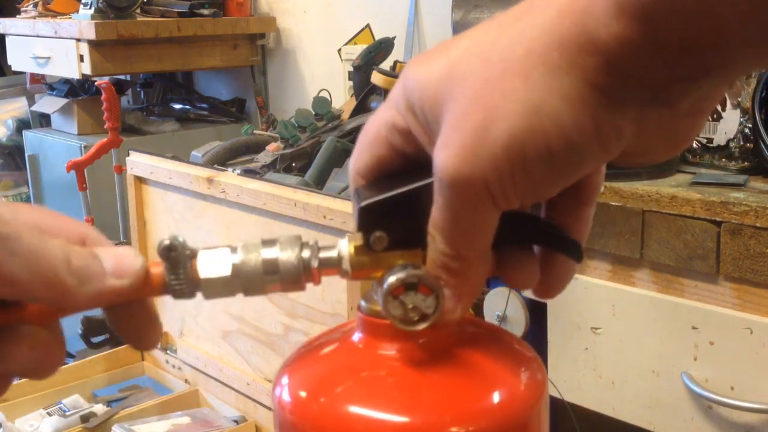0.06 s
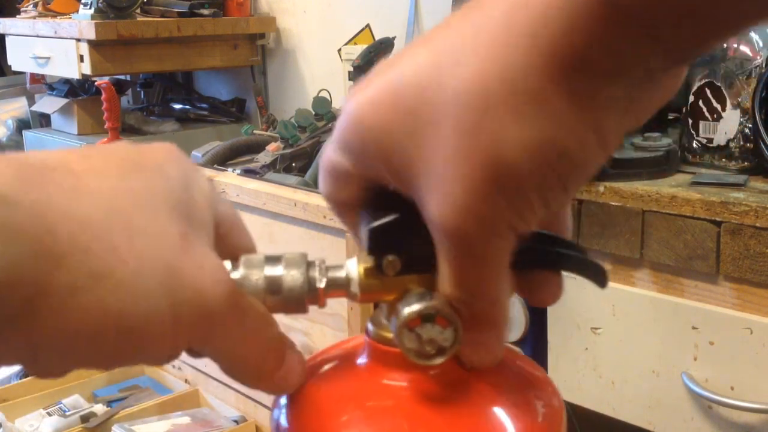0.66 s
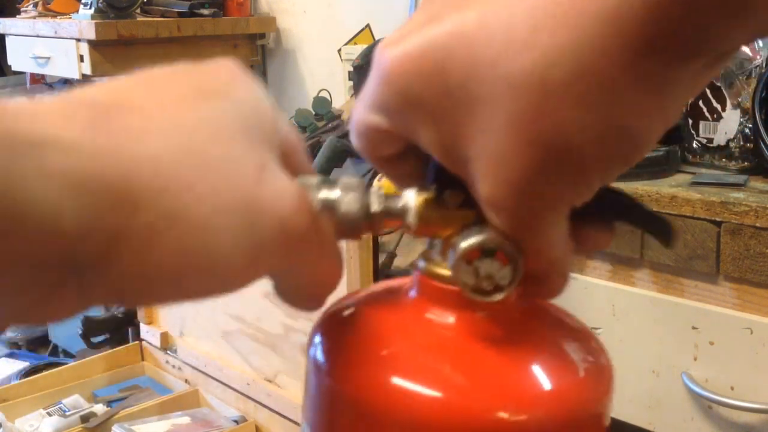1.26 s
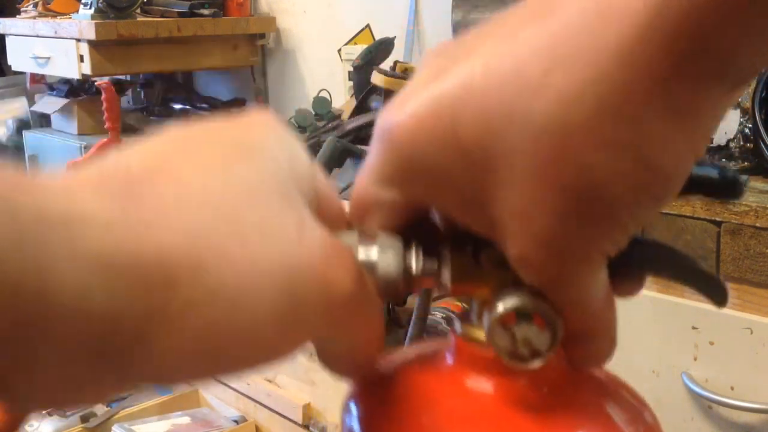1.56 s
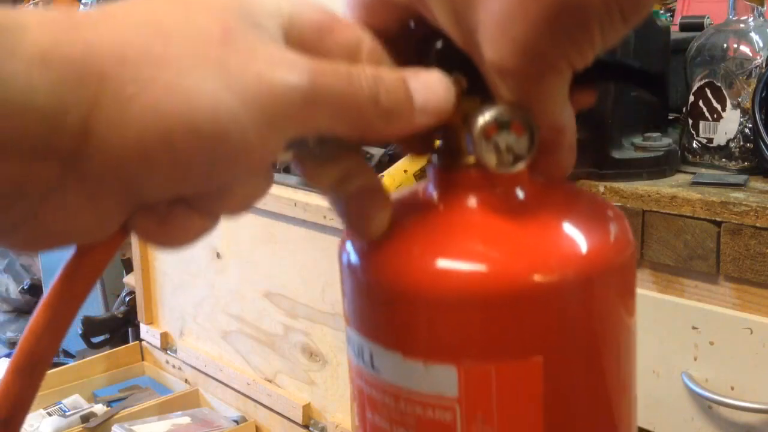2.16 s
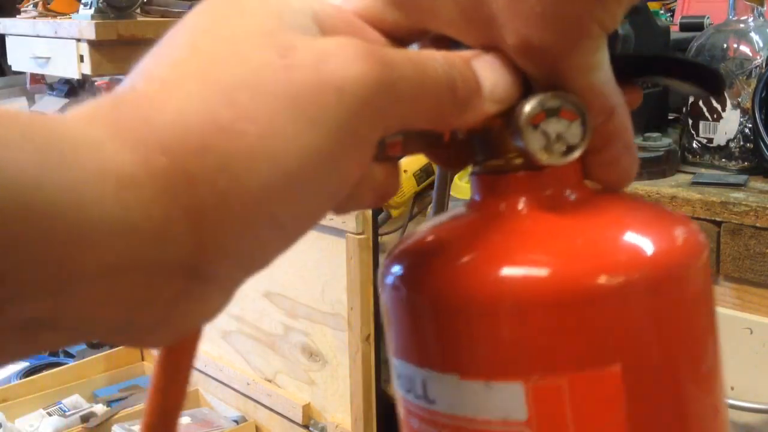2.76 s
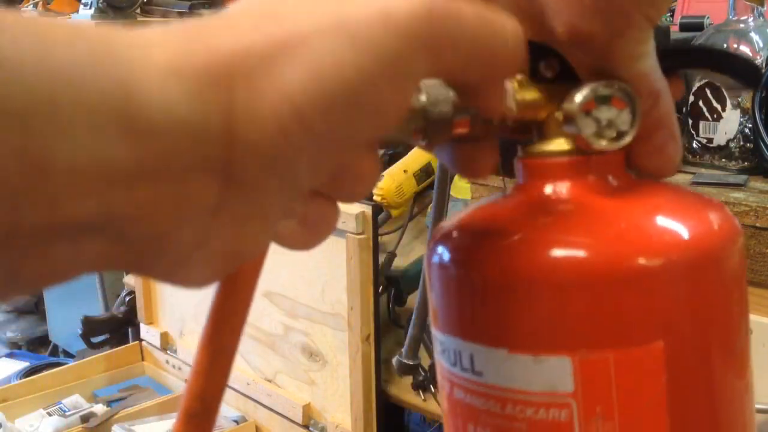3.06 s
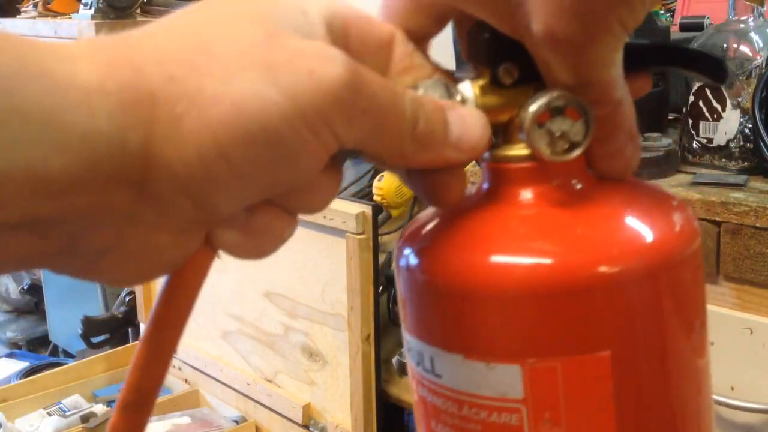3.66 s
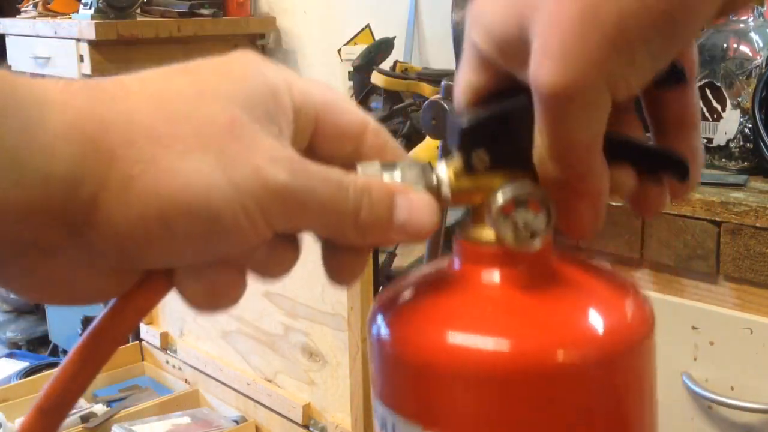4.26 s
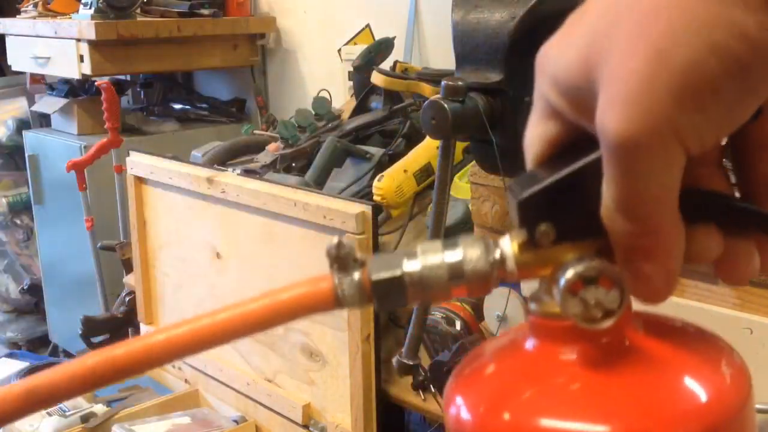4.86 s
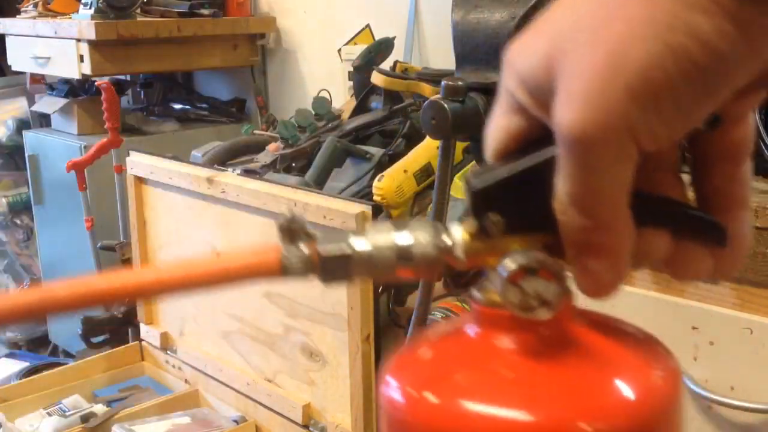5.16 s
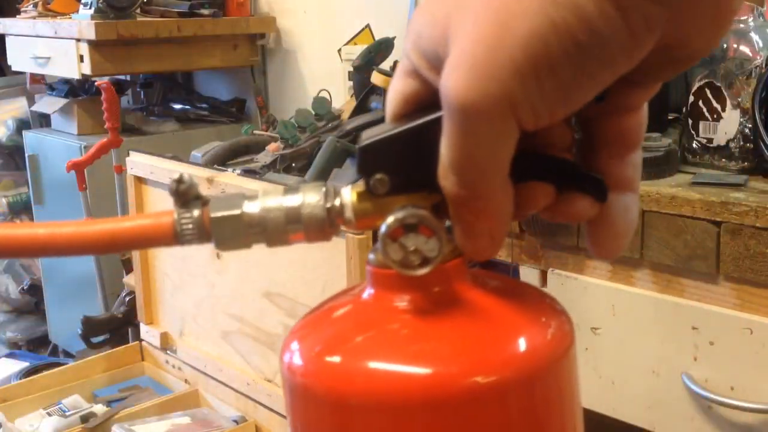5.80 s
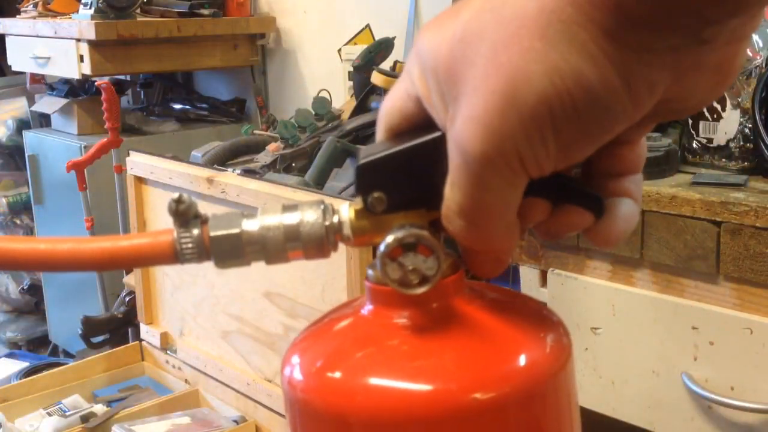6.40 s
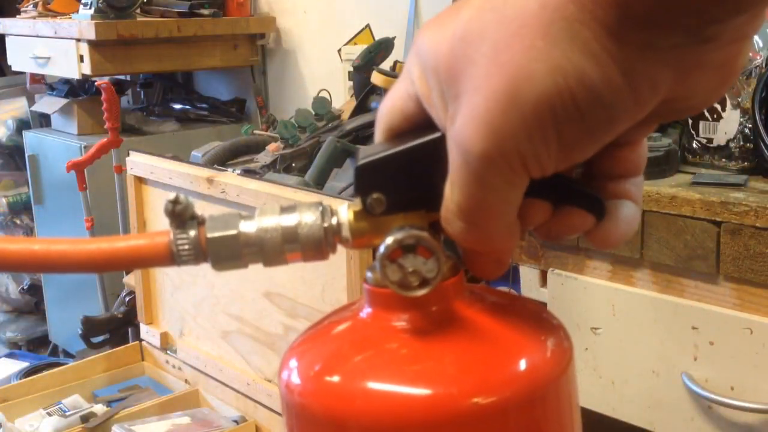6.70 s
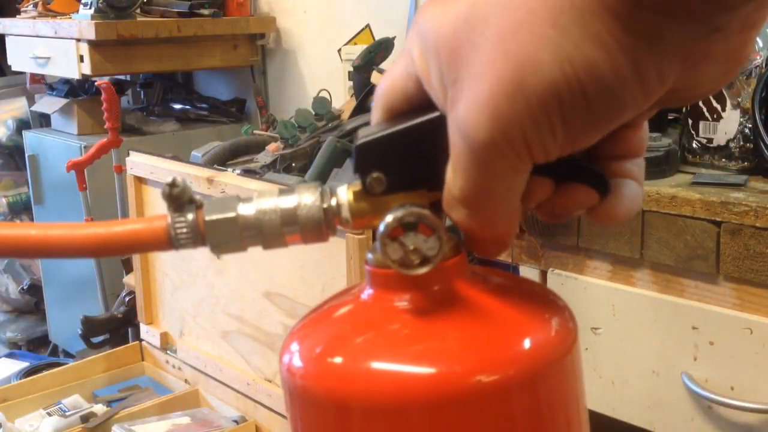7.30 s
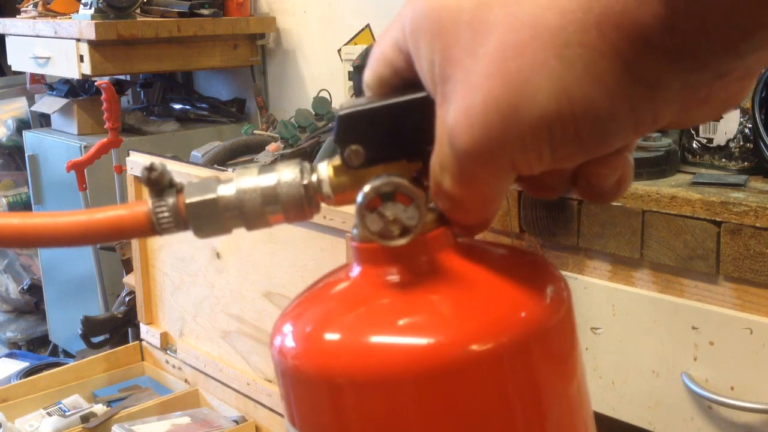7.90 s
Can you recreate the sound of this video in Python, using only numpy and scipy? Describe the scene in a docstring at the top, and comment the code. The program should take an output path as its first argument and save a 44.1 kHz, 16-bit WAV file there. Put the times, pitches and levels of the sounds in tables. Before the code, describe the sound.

A sharp metallic click, leaking compressed air with light knocks, then a thin whistle as a compressor begins humming in a workshop.

```python
"""Air hose on a steel cylinder

A coupler snaps onto the cylinder's valve with a crack and a steel ring. Air leaks and spits at the
seal, combed by a moving echo, while a hand rubs the hose and knocks the fittings. The lever is
squeezed, air whistles through the valve, and a piston compressor starts up across the workshop."""
import sys
import numpy as np
from scipy import signal
from scipy.fft import rfft, irfft, next_fast_len
from scipy.io import wavfile
from scipy.ndimage import uniform_filter1d, map_coordinates

SR = 44100
rng = np.random.default_rng(int(sys.argv[2]) if len(sys.argv) > 2 else 0)


def dump_mix(stems):
    """Bounce the given channels to the path in sys.argv[1] as a 16-bit WAV at rate SR."""
    frames = np.atleast_2d(stems).T  # one column per channel
    limited = np.clip(frames, -1, 1)  # hard clip at full scale
    pcm = np.round(limited * 32767).astype(np.int16)
    wavfile.write(sys.argv[1], SR, pcm)


N = 350242
T = np.arange(N) / SR


def amp(db):
    """Decibels to gain."""
    return np.exp(np.asarray(db) * np.log(10) / 20)


def unit(x):
    """Scaled to rms 1."""
    return x / np.sqrt(np.mean(x ** 2) + 1e-20)


def along(points, hz):
    """(Hz, value) points read on a log axis."""
    point_hz, values = np.transpose(points)
    return np.interp(np.log(hz + 1), np.log(point_hz + 1), values)


def curves(rows, outside=None):
    """One value per sample for each column after the time."""
    times, *columns = np.transpose(rows)
    return [np.interp(T, times, column, outside, outside) for column in columns]


def wobble(rate_hz):
    """Smooth random curve, rate_hz knots a second."""
    knots = rng.standard_normal(int(N * rate_hz / SR) + 4)
    fine = signal.resample_poly(knots, 10, 1)
    return np.interp(T * rate_hz * 10, np.arange(len(fine)), fine)


def filtered(x, response):
    """x through a frequency response."""
    size = next_fast_len(N + SR // 2)
    return irfft(rfft(x, size) * response(np.fft.rfftfreq(size, 1 / SR)), size)[:N]


def noise(spectrum):
    """Noise coloured by (Hz, dB) points, rms 1."""
    return unit(filtered(rng.standard_normal(N), lambda hz: amp(along(spectrum, hz))))


def blown(modes):
    """Turbulence ringing in (Hz, half-width in Hz, dB) resonances, rms 1."""
    def response(f):
        return np.sqrt(sum((amp(db) / (1 + ((f - hz) / width) ** 2)) ** 2 for hz, width, db in modes))
    return unit(filtered(rng.standard_normal(N), response))


def burst(start, length, attack_s, t60_s):
    """Gain that rises at start, holds until start + length and dies away."""
    gain = np.zeros(N)
    live = (T > start) & (T < start + length + 2 * t60_s)
    t = T[live] - start
    gain[live] = np.minimum(t / attack_s, 1) * amp(-60 * np.maximum(t - length, 0) / t60_s)
    return gain


def bursts(rows, attack_s, t60_s):
    """Joint gain of (start, length, dB) bursts."""
    return np.sqrt(sum((amp(db) * burst(s, length, attack_s, t60_s)) ** 2 for s, length, db in rows))


def swell(start, length):
    """One arch from 0 to 1 and back."""
    return np.sin(np.pi * np.clip((T - start) / length, 0, 1))


def patchy(x, depth_db, size):
    """Patches of random gain, size = (bands of 86 Hz, steps of 6 ms)."""
    spectra = signal.stft(x, nperseg=512)[2]
    field = rng.standard_normal(spectra.shape)
    for axis in (0, 1, 0, 1):
        field = uniform_filter1d(field, size[axis], axis)
    gain = unit(amp(depth_db * unit(field)))
    return signal.istft(spectra * gain, nperseg=512)[1][:N]


# Room tone and rubbing spectra. Each row: frequency in Hz, relative density in dB.
ROOM_TONE_SPECTRUM = [(25, -40), (62, -29), (95, -11.5), (130, -6), (180, -2), (290, -3), (400, -7.5),
                      (700, -13), (1100, -11), (1800, -16.5), (3000, -38), (8000, -62)]
RUB_SPECTRUM = [(50, -70), (120, -35), (260, -8.5), (430, -1.5), (600, -11.5), (900, -13.5), (1600, -25)]
# Rubs. Each row: start in seconds, length in seconds, relative level in dB.
HAND_RUBS = [(.5, 0.28, -60), (.75, 0.71, -55.5), (1.8, 0.42, -60), (4.4, 0.46, -61), (5.25, 0.058, -63),
             (5.57, 0.44, -61)]


def background(floor_db=-66, mains_db=-83, rub_db=-2):
    """Room tone, a faint mains hum and the dull rubbing of hand and hose."""
    mains = np.sqrt(2) * np.sin(2 * np.pi * 100 * T)
    rubbing = bursts(HAND_RUBS, attack_s=0.025, t60_s=0.43) * noise(RUB_SPECTRUM)
    return amp(floor_db) * noise(ROOM_TONE_SPECTRUM) + amp(mains_db) * mains + amp(rub_db) * rubbing


# Sleeve blows. Each row: start in seconds, relative level in dB, crack T60 in seconds.
SLEEVE_BLOWS = [(.002, -23, 0.071), (0.033, -27.5, 0.043)]
# Steel ring. Each row: frequency in Hz, relative level in dB, T60 in seconds.
STEEL_MODES = [(1030, -32, 0.93), (2360, -19.5, 0.41), (3398, -13.5, 0.47), (3500, -20, 0.54),
               (3736, -23, .3), (6080, -1, 0.22), (6165, -12, 0.16), (8511, -23, .1)]
# Crack. Each row: frequency in Hz, relative density in dB.
CRACK_SPECTRUM = [(100, -47), (250, -15), (450, -21), (620, -2.5), (900, -7.5), (1300, -2), (1850, -4.5),
                  (2500, -8.5), (3100, 0), (4500, -4.5), (6000, -7), (7500, -7.5), (9500, -23),
                  (15000, -27)]
# Squeak. Each row: time in seconds, pitch in Hz, level in dB.
SEAL_SQUEAK = [(.285, 3500, -70), (.3, 4300, -59), (.316, 5500, -59), (.33, 5600, -78)]


def sleeve(ring_db=-11, crack_db=-5.0):
    """The locking sleeve snaps home in two ringing blows; the rubber seal squeaks as it seats."""
    snaps = np.zeros(N)
    t = np.arange(SR // 2) / SR
    grit = noise(CRACK_SPECTRUM)
    for start_s, db, crack_t60 in SLEEVE_BLOWS:
        start = round(start_s * SR)
        ring = sum(amp(level + rng.normal(0, 1) - 60 * t / t60) * np.sin(2 * np.pi * hz * t)
                   for hz, level, t60 in STEEL_MODES)
        crack = grit[start:][:len(t)] * amp(-60 * t / crack_t60)
        snaps[start:][:len(t)] += amp(db) * (amp(ring_db) * ring + amp(crack_db) * crack)
    squeak_hz, squeak_db = curves(SEAL_SQUEAK, outside=-120)
    squeak = amp(squeak_db + 2.2 * wobble(460)) * np.sin(2 * np.pi * np.cumsum(squeak_hz) / SR)
    return snaps + squeak


# Steady leak. Each row: time in seconds, relative flow in dB, brightness in dB.
LEAK_FLOW = [(0, -63.5, 2), (1.185, -64, 0), (1.225, -40, 7.5), (1.5, -41, 10.5), (1.82, -41, 2.5),
             (2.15, -39, 3.5), (2.4, -36.5, 7.5), (2.57, -45, 5.5), (2.85, -43.5, 5), (3.1, -48, -2.5),
             (3.65, -45.5, -5.5), (4.33, -49.5, -4.5), (4.42, -51.5, -2), (4.9, -52.5, -3),
             (4.96, -49.5, -6), (5.5, -51, -6.5), (6, -52, -3.5), (7.94, -52, -5)]
# Extra air. Each row: start in seconds, length in seconds, relative level in dB, treble tilt in dB.
SEAL_SPURTS = [(.28, .04, -63.5, 5), (0.367, 0.079, -66, 2), (0.493, 0.017, -59, -5),
               (.53, 0.072, -62.5, 1), (0.674, 0.052, -60.5, 3), (0.928, .05, -55, 2),
               (0.993, 0.15, -59.5, 1.5), (1.205, 0.055, -43.5, 2.5), (1.546, 0.13, -39.5, 7.5),
               (1.697, 0.15, -52, 11.5), (1.874, 0.034, -41, 6.5), (2.094, 0.13, -46, 7.5),
               (2.977, 0.053, -49, -7), (3.135, .02, -48, -2), (3.175, 0.033, -46.5, -4.5),
               (3.216, 0.14, -56.5, 5), (3.311, .03, -54.5, -13), (3.48, 0.071, -45, -3),
               (3.9, .18, -67, 13), (4.083, .02, -48, 1), (5.603, 0.82, -53.5, -2.5)]
SPURT_ATTACK_S, SPURT_T60_S = 0.019, 0.19


def leak_gains(rush_db=-2.5, spray_db=-4.5, spray_slope=0.39, spurt_side_db=-1.5):
    """Gains of low rush, mid jet and high spray: a brighter leak trades rush for spray."""
    flow_db, bright_db = curves(LEAK_FLOW)
    thumb_db = -5.5 * swell(2.33, 0.92)  # the thumb covers the coupler and shades the spray
    power = amp([flow_db + rush_db - bright_db,
                 flow_db,
                 flow_db + spray_db + spray_slope * bright_db + thumb_db]) ** 2
    for start, length, db, tilt_db in SEAL_SPURTS:
        shares = amp([db + spurt_side_db - tilt_db, db, db + spurt_side_db + tilt_db])
        power += np.outer(shares ** 2, burst(start, length, SPURT_ATTACK_S, SPURT_T60_S) ** 2)
    return np.sqrt(power)


# Seal gap. Each row: time in seconds, opening from 0 (tight) to 1 (wide).
SEAL_GAP = [(1.19, .15), (1.25, 0.81), (3.2, 0.8), (3.7, 0.65), (4.15, .05)]
# Leak spectra. Each row: frequency in Hz, relative density in dB.
WIDE_RUSH = [(600, -30.5), (1500, -15), (2000, -6.5), (2450, -3), (2850, 0), (3200, -1.5), (3600, -6),
             (4300, -6.5), (5200, -12), (7000, -38)]
WIDE_JET = [(1500, -38), (3200, -6), (4600, 1), (5500, 0.5), (6200, -1), (7200, -5), (8000, -10),
            (9200, -17), (12000, -34)]
WIDE_SPRAY = [(4000, -38), (8000, -0.5), (9000, -2), (10200, -1.5), (11500, 0.5), (13000, 1.5), (14200, -7),
              (15300, -2.5)]
TIGHT_RUSH = [(600, -35.5), (1400, -15.5), (1850, -9.5), (2130, -9), (2400, -4), (2930, 0.5), (3250, -3.5),
              (3600, -6.5), (4400, -7), (5200, -13), (7000, -29.5)]
TIGHT_JET = [(2000, -22.5), (3600, -8.5), (4800, -2.5), (5600, -4.5), (6400, 0), (7000, 1.5), (8000, -3.5),
             (9000, -13), (12000, -25)]
TIGHT_SPRAY = [(4000, -35), (8000, -6.5), (9200, 1.5), (10400, -4.5), (12200, 1.5), (13000, 1),
               (14200, 5.5), (15300, -1)]
SPIT_SPECTRUM = [(80, -60), (300, -11), (700, -11.5), (1100, -2.5), (1500, -0.5), (2000, 1.5), (3000, -28)]
# Seal edge. Each row: frequency in Hz, half-width in Hz, relative level in dB.
EDGE_MODES = [(5960, 560, 2), (7160, 250, -6)]
# Edge rings and sputters. Each row: start in seconds, length in seconds, relative level in dB.
EDGE_RINGS = [(1.887, 0.61, -35.5), (2.793, 0.11, -41)]
SEAL_SPUTTERS = [(1.215, 0.049, -42.5), (1.29, 0.55, -54), (1.825, 0.023, -53), (1.92, 0.044, -47.5),
                 (2.12, 0.25, -54.5), (2.37, 0.074, -51.5), (2.6, 0.051, -63), (2.73, .3, -60),
                 (3.14, 0.41, -60.5), (3.485, 0.05, -53.5), (3.56, 0.65, -68)]


def leak(flutter_db=0.65, grain_db=0.8, sputter_db=2.5, drift_db=0.3, spit_db=-1, swirl_db=1.3):
    """The seal weeps, bursts open and is worked tighter; the jet spits and rings on its edge."""
    gap = curves(SEAL_GAP)[0]
    colours = [(WIDE_RUSH, TIGHT_RUSH), (WIDE_JET, TIGHT_JET), (WIDE_SPRAY, TIGHT_SPRAY)]
    air = np.zeros(N)
    for gain, (wide, tight) in zip(leak_gains(), colours):
        drift = amp(drift_db * gap * wobble(24.85))
        air += gain * drift * (np.sqrt(gap) * noise(wide) + np.sqrt(1 - gap) * noise(tight))
    air = patchy(air, swirl_db, size=(5, 20))
    air += sum(amp(db) * swell(start, length) for start, length, db in EDGE_RINGS) * blown(EDGE_MODES)
    unrest = .35 + .65 * gap  # a tight seal hisses more evenly
    air *= amp(unrest * (flutter_db * wobble(45) + grain_db * wobble(700)))
    spit = unit(noise(SPIT_SPECTRUM) * amp(sputter_db * wobble(170)))
    return air + amp(spit_db) * bursts(SEAL_SPUTTERS, SPURT_ATTACK_S, SPURT_T60_S) * spit


# Echo path. Each row: time in seconds, base delay in ms, gain.
ECHO_PATH = [(.5, 1.48, .2), (1.6, 1.08, .28), (2, 1.05, .4), (2.45, .9, .42), (2.95, .84, .42),
             (3.8, 1.0, .4), (4.3, 1.08, .4), (4.6, 1.15, .12)]


def moving_echo(air, cutoff_hz=9000):
    """A nearby surface combs the hiss; longer paths add finer, drifting ripples."""
    delay_ms, gain = curves(ECHO_PATH)

    def delayed(x, path_ratio):
        return map_coordinates(x, [np.arange(N) - path_ratio * delay_ms * SR / 1000], order=2)

    dulled = filtered(air, lambda hz: 1 / (1 + (hz / cutoff_hz) ** 4))  # treble scatters away
    clutter = sum(delayed(air, path_ratio) for path_ratio in (2.4, 4.3, 7.1)) / 2
    return air + gain * (delayed(dulled, 0.97) + clutter)


# Knocks. Each row: start in seconds, relative level in dB, centre in Hz, half-width in Hz,
# T60 in seconds.
FITTING_KNOCKS = [(.283, -47, 2900, 700, .02), (.503, -47.5, 5400, 4400, 0.087),
                  (.782, -38.5, 2430, 190, 0.02), (.803, -52, 3600, 700, .025),
                  (.822, -54, 2230, 600, .025), (1.085, -43, 1550, 180, .03),
                  (1.117, -42.5, 1500, 200, 0.025), (1.843, -35, 1900, 600, .02),
                  (1.966, -39, 1100, 510, .03), (2.272, -26.5, 2220, 150, 0.023),
                  (2.416, -42, 1150, 230, 0.033), (2.625, -43.5, 1300, 250, 0.021),
                  (2.648, -41, 1250, 220, 0.018), (2.77, -53, 1070, 25, 0.22), (2.85, -46, 1300, 270, .015),
                  (2.902, -42.5, 1200, 300, .015), (2.966, -30, 2220, 2600, 0.012),
                  (2.968, -59, 1025, 8.2, 0.55), (4.717, -35, 3500, 2200, 0.015),
                  (5.309, -48.5, 664, 56, 0.051), (5.617, -39, 1880, 150, .04)]


def fittings(gain_db=-4):
    """Fittings and cylinder knock in the hand, which damps most of them at once."""
    knocks = np.zeros(N)
    t = np.arange(SR // 2) / SR
    f = np.fft.rfftfreq(len(t), 1 / SR)
    for start, db, hz, width, t60 in FITTING_KNOCKS:
        shape = np.minimum(f / hz, 1) / (1 + ((f - hz) / width) ** 2)  # small parts radiate no bass
        body = irfft(rfft(rng.standard_normal(len(t))) * shape, len(t))
        fade = amp(-60 * t / t60)
        knock = unit(body * fade) * np.sqrt(np.mean(fade ** 2))
        knocks[round(start * SR):][:len(t)] += amp(db + gain_db) * knock
    return knocks


# Valve hiss. Each row: frequency in Hz, relative density in dB.
VALVE_SPECTRUM = [(100, -70), (1200, -41), (2500, -24), (4500, -8), (6600, -10), (8500, 1), (10000, -8),
                  (12000, 1), (14000, 6), (15300, -8)]
# Valve cavities and dip tube. Each row: nominal pitch in Hz, half-width in Hz, relative level in dB.
CAVITY_MODES = [(5000, 26, -5), (6600, 26, -18), (6960, 90, -2.5), (7445, 31, 9.5), (8060, 90, -7),
                (8630, 40, 0.5), (8320, 40, 0.5), (8530, 35, 4.5), (9340, 69, 0.5), (9580, 26, 8.5),
                (10300, 110, -4), (10600, 46, -2), (11200, 55, -9), (11300, 68, -1.5), (12100, 61, -3),
                (12600, 54, -2), (13700, 52, 5), (13930, 32, 6), (14500, 62, -22), (14760, 48, 5),
                (15190, 70, -1)]
TUBE_MODES = [(1480, 18, -16), (1998, 18.4, -4), (3324, 7, 3), (3540, 14, -8)]
# Whistles. Each row: nominal pitch in Hz, half-width in Hz.
WHISTLE_MODES = [(5670, 32), (6130, 93)]
# Tones catching. Each row: start and length in seconds, then relative levels in dB of tube,
# lower whistle and upper whistle.
TONE_CATCHES = [(6.05, 0.13, -51.5, -46, -50), (6.15, 0.17, -44.5, -47.5, -54),
                (6.208, 0.065, -59, -40, -45), (6.348, .115, -49, -54, -32), (6.429, 0.078, -55, -45, -56),
                (6.568, 0.098, -60, -48, -36), (6.719, .12, -72, -58, -33.5), (6.987, .2, -80, -62, -43.5)]
# Side tones. Each row: start and length in seconds, nominal pitch in Hz, relative level in dB.
VALVE_SQUEALS = [(6.2, .1, 5960, -49), (6.476, 0.11, 4950, -49), (6.574, 0.075, 5000, -46),
                 (6.6, 0.063, 4620, -52), (6.64, 0.12, 6460, -41)]
LEVER_S, OPENING_S, FULL_S = 5.985, 0.38, 6.76
SAG_DB_PER_S, DYING_DB_PER_S = 10, 23.5
SETTLED_PITCH_RATIO, FLAT_SHARE, SETTLE_S = 1.007, .068, .17


def valve(flow_db=-31.5, hiss_db=-4, cavity_db=-3.5, tone_dbs=(-26.5, -14, -11), break_db=1.1):
    """Air sings in the valve and its tube, flat at first; the flow sags as the cylinder fills."""
    t = np.maximum(T - LEVER_S, 0)
    sag_db = SAG_DB_PER_S * np.maximum(t - OPENING_S, 0)
    dying_db = DYING_DB_PER_S * np.maximum(T - FULL_S, 0)
    flow = np.minimum(t / OPENING_S, 1) * amp(-sag_db - dying_db)
    pitch_ratio = SETTLED_PITCH_RATIO - FLAT_SHARE * np.exp(-t / SETTLE_S) + .002 * wobble(16)
    position = np.cumsum(pitch_ratio)

    def sing(modes):
        return map_coordinates(blown(modes), [position], mode="wrap")

    hiss = amp(hiss_db) * flow ** 1.3 * noise(VALVE_SPECTRUM)
    ringing = amp(cavity_db) * flow ** 0.85 * sing(CAVITY_MODES)  # sounds first, lasts longest
    air = amp(flow_db) * patchy(hiss + ringing, depth_db=3.0, size=(3, 10))
    tones = [TUBE_MODES] + [[(hz, width, 0)] for hz, width in WHISTLE_MODES]
    catches = sum(np.outer(amp(dbs), swell(start, length)) for start, length, *dbs in TONE_CATCHES)
    for modes, tone_db, catch in zip(tones, tone_dbs, catches):
        steady = flow * amp(flow_db + tone_db)
        air += np.hypot(steady, catch) * amp(break_db * wobble(30)) * sing(modes)
    for start, length, hz, db in VALVE_SQUEALS:
        air += amp(db) * swell(start, length) * np.sin(2 * np.pi * hz * position / SR)
    flicker = amp(0.53 * wobble(25))
    return air * flicker


# Hum. Each row: crank multiple (rounded when played), relative level in dB, throb depth from 0 to 1.
HUM_PARTIALS = [(6, -79, 0.1), (8.26, -56, 0.03), (10, -63.5, 0.1), (12.1, -59, 0.04), (16.3, -51, 0.17),
                (19.8, -69, 0.4), (21.94, -64, 0), (24.45, -58, 0.1), (26.55, -65, 0.1), (30.2, -68, 0.2),
                (38.35, -57.5, 0), (47.4, -67, 0.1), (54.56, -51, 0.46), (58, -67, 0.7), (62, -68, 0.3),
                (70.3, -70, 0.1)]
# Clatter. Each row: frequency in Hz, relative density in dB.
CLATTER_SPECTRUM = [(30, -55), (70, -35), (130, -0.5), (220, -8), (290, 6.5), (420, 1.5), (530, -6.5),
                    (650, 1.5), (780, -0.5), (920, 4), (1100, -5.5), (1600, -5), (2500, -14), (5000, -30)]
# Frame. Each row: frequency in Hz, half-width in Hz, relative level in dB.
FRAME_MODES = [(287, 31, -5), (632, 28, -14), (772, 18, -4.5), (884, 26, -10), (1022, 30, -9.5)]
# Starting jolts. Each row: start in seconds, level in dB.
FRAME_JOLTS = [(6.42, -53.5), (6.469, -38.5)]
PUMP_START_S, HUM_RISE_S, CRANK_HZ = 6.47, 0.16, 16.22
CLATTER_RISE_S, STRAIN_DB, STRAIN_S = .03, 4.5, 0.16
JOLT_ATTACK_S, JOLT_T60_S = 0.021, 0.42


def compressor(hum_db=-1.16, clatter_db=-52, motor_share=0.3, clatter_throb=0.051):
    """The pump jolts, clatters hardest at first, hums on crank multiples and throbs once a stroke."""
    t = np.maximum(T - PUMP_START_S, 0)
    crank = 2 * np.pi * CRANK_HZ * (T - 7.502) + .005 * wobble(6)
    stroke = np.cos(crank)
    motor_turn = -np.cos(3 * crank)  # the belt gives three motor turns to a stroke
    hum = np.zeros(N)
    for order, db, throb in HUM_PARTIALS:
        pulsing = (1 + throb * stroke) * (1 + throb * motor_share * motor_turn)
        tone = np.sin(round(order) * crank + rng.uniform(0, 2 * np.pi))
        hum += amp(db) * unit(pulsing * tone)
    hum *= 1 - np.exp(-t / HUM_RISE_S)
    clatter = noise(CLATTER_SPECTRUM) * (1 + clatter_throb * (stroke + motor_turn))
    effort = np.minimum(t / CLATTER_RISE_S, 1) * amp(STRAIN_DB * np.exp(-t / STRAIN_S))
    jolts = [(start, JOLT_ATTACK_S, db) for start, db in FRAME_JOLTS]
    shudder = bursts(jolts, JOLT_ATTACK_S, JOLT_T60_S) * blown(FRAME_MODES)
    return amp(hum_db) * hum + amp(clatter_db) * effort * clatter + shudder


# Room decay. Each row: frequency in Hz, T60 in seconds.
WORKSHOP_DECAY = [(200, 0.72), (2000, 0.4), (12000, 0.2)]


def room(x):
    """The cluttered workshop answers with a short tail."""
    hz, t, spectra = signal.stft(rng.standard_normal(SR // 2), SR, nperseg=256)
    decay = amp(-60 * t / along(WORKSHOP_DECAY, hz)[:, None])
    tail = signal.istft(spectra * decay, SR, nperseg=256)[1]
    return signal.fftconvolve(x, tail / np.linalg.norm(tail))[:N]


def scene(knock_wet_db=-11, leak_wet_db=-11, valve_wet_db=-6.0, leak_db=-.8, valve_db=-2.05):
    """Close knocks and air with some room, plus compressor and background, in mono."""
    knocks = sleeve() + fittings()
    hiss = amp(leak_db) * moving_echo(leak())
    whistle = amp(valve_db) * valve()
    tail = room(amp(knock_wet_db) * knocks + amp(leak_wet_db) * hiss + amp(valve_wet_db) * whistle)
    mono = knocks + hiss + whistle + tail + compressor() + background()
    return np.array([mono, mono])


def record(dry, low_cut_hz=75, top_hz=15330):
    """Rolls off the deep bass and removes everything above top_hz."""
    def response(hz):
        return (hz < top_hz) * hz ** 2 / np.sqrt(hz ** 4 + low_cut_hz ** 4)
    return np.array([filtered(channel, response) for channel in dry])


dry = scene()
out = record(dry)
dump_mix(out)
```